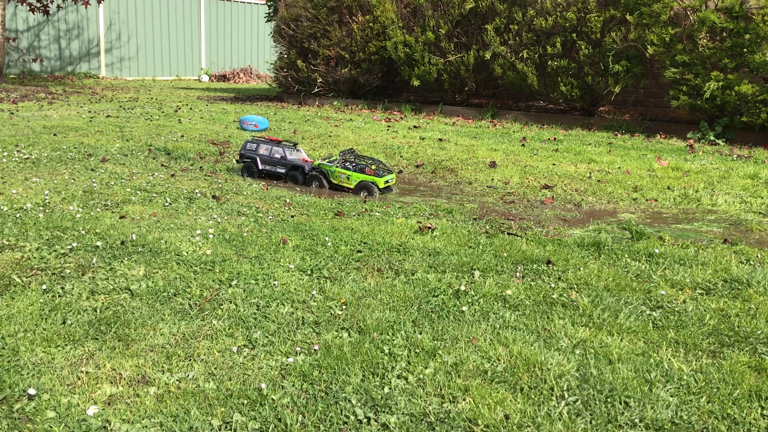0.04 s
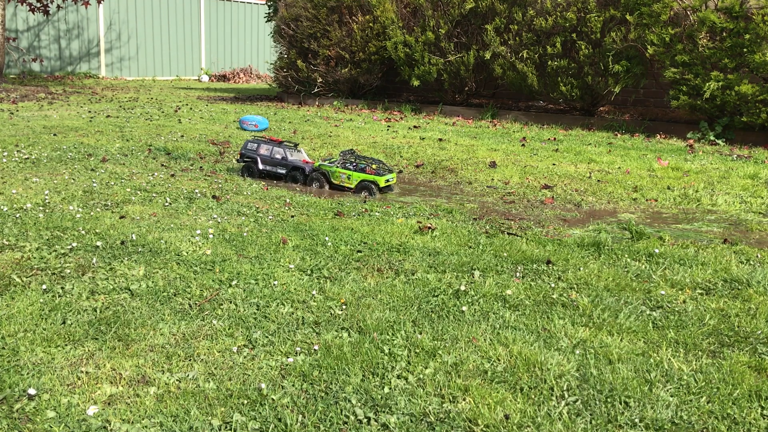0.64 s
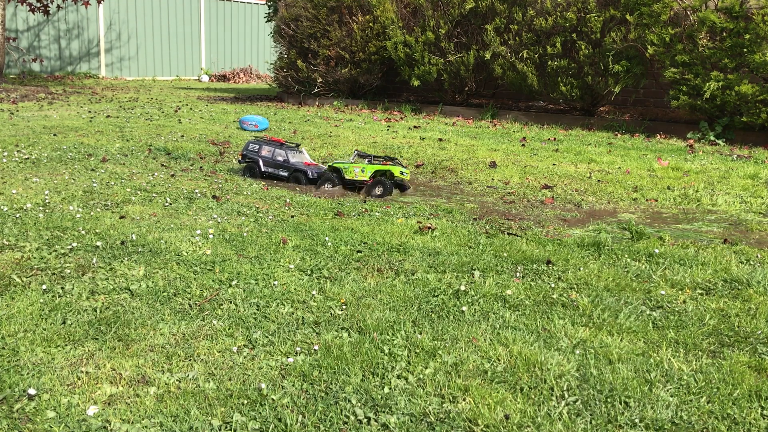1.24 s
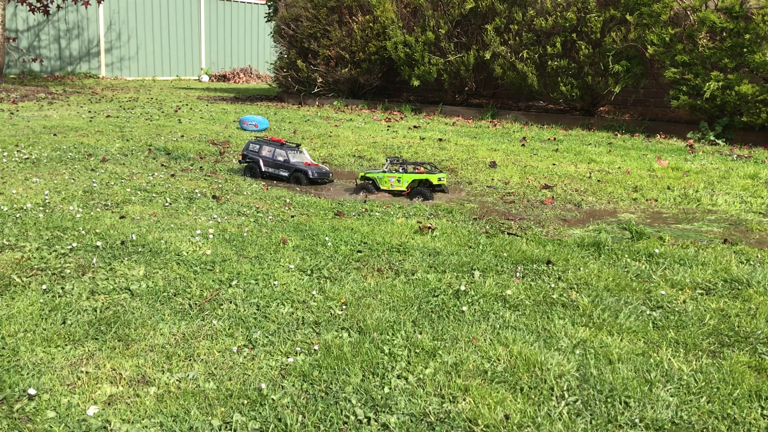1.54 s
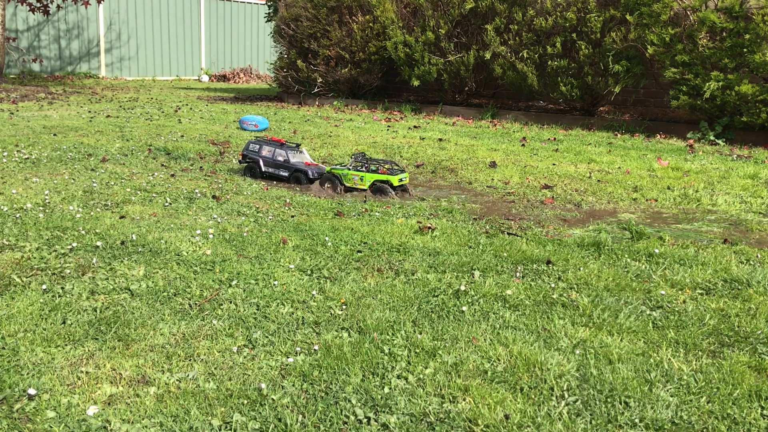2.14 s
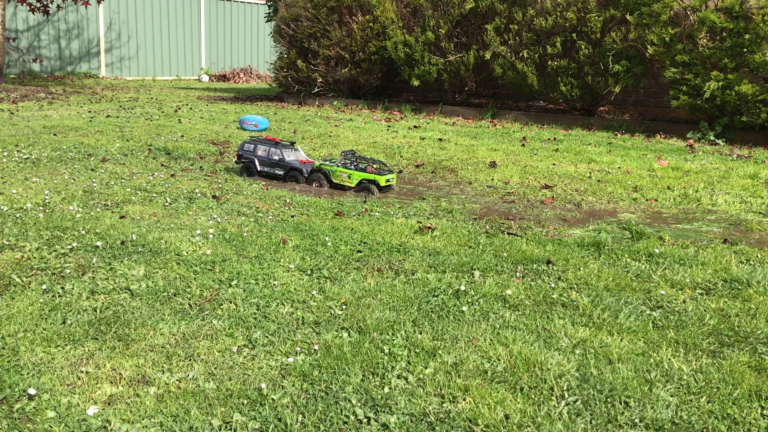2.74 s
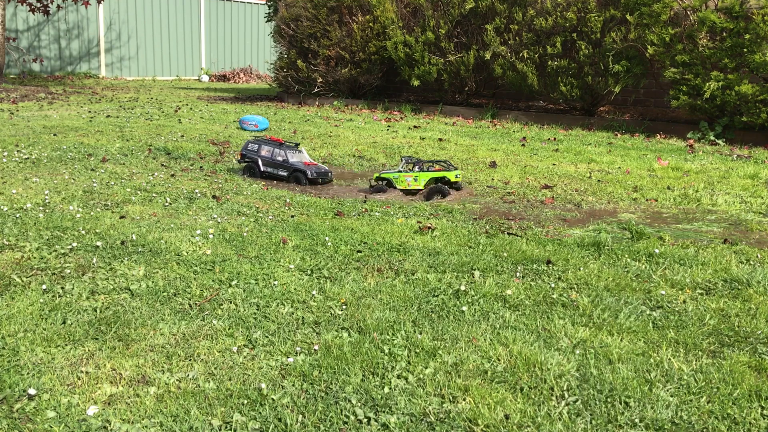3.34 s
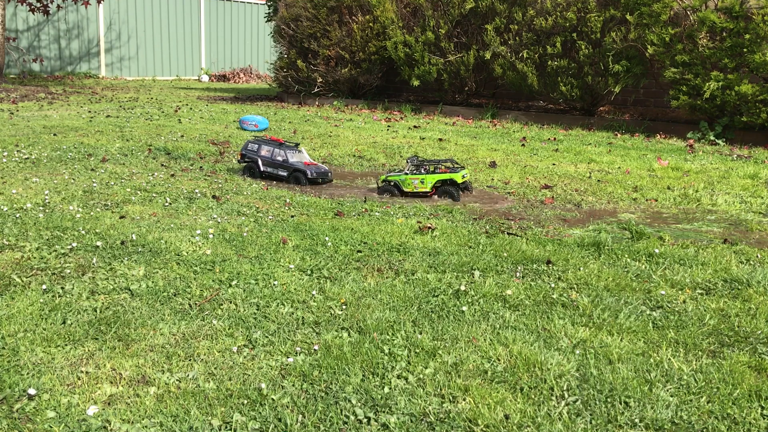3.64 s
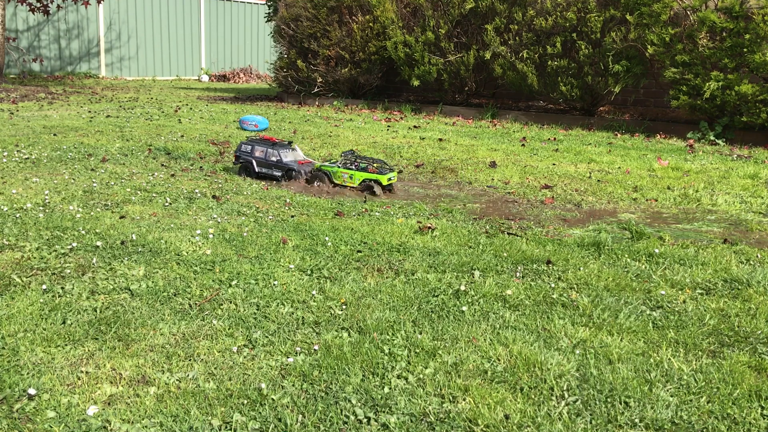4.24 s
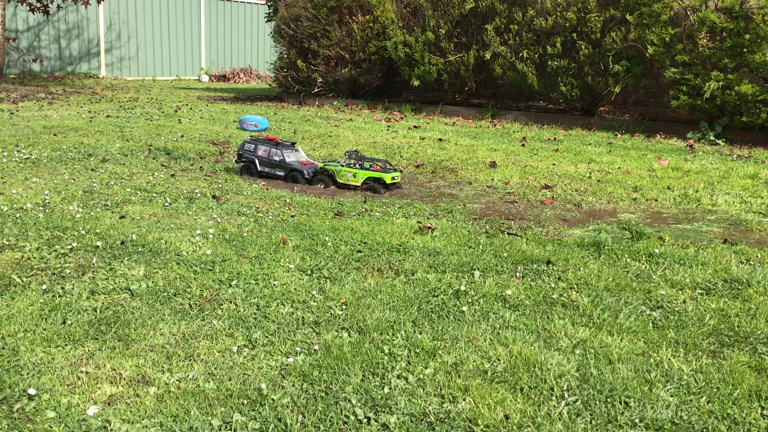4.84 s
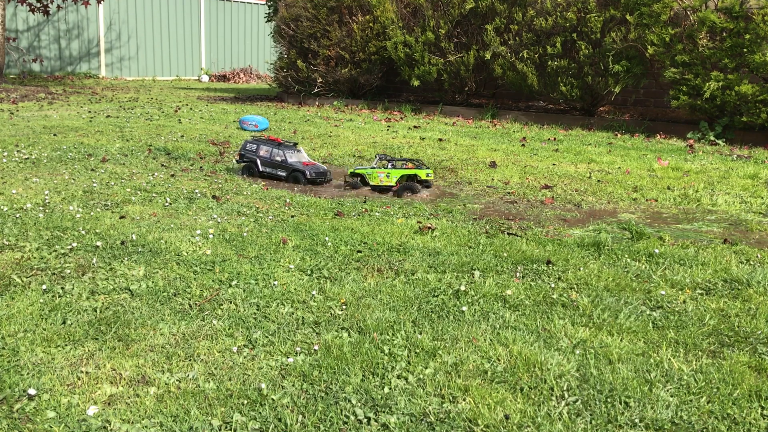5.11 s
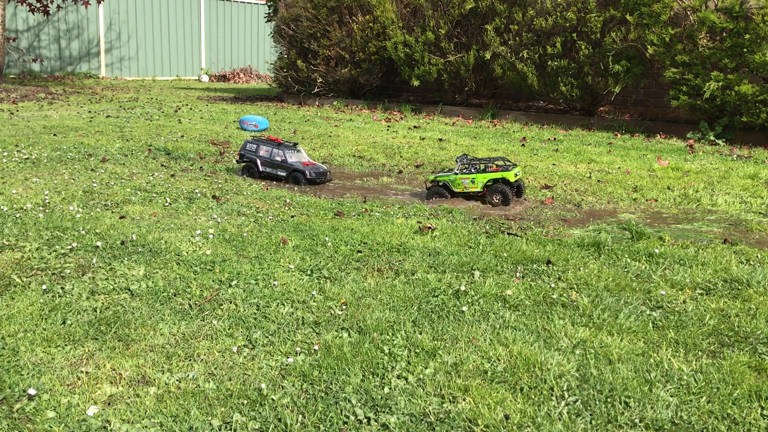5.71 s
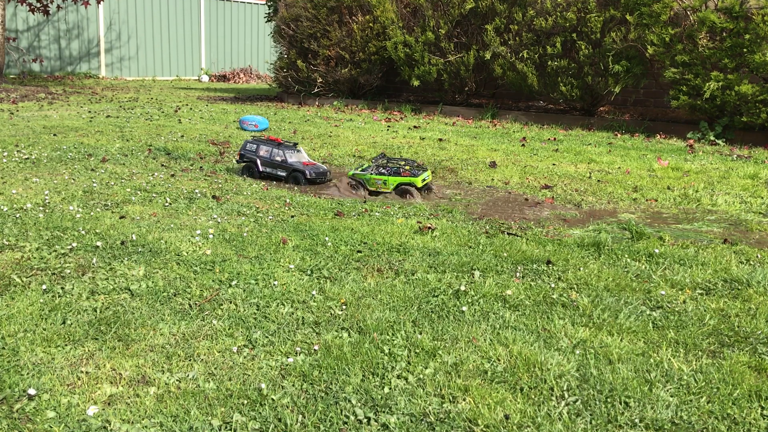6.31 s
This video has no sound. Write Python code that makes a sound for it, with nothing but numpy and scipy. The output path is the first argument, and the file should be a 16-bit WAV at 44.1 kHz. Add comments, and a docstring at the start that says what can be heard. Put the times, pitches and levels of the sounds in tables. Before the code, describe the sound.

Fluttering bursts of small electric motor whine, churning mud and a few plastic knocks from a remote-control truck stuck in a puddle outdoors.

```python
"""Radio-controlled truck in a mud puddle

On a lawn, some metres from a single microphone, the truck rocks back and forth through the mud.
Its gears whine in seven bursts and flutter as the drive shafts turn; the tyres churn and fling wet mud,
and the chassis bumps a second truck. Early on a rasping squeal carries round the yard."""
import sys
import numpy as np
from scipy import signal
from scipy.fft import rfft, irfft
from scipy.io import wavfile
from scipy.ndimage import uniform_filter1d

SR = 44100
rng = np.random.default_rng(int(sys.argv[2]) if len(sys.argv) > 2 else 0)


def master(y):
    """Save y as 16-bit WAV."""
    cut = np.clip(np.atleast_2d(y).T, -1, 1)
    pcm = np.round(cut * 32767)  # scale
    wavfile.write(sys.argv[1], SR, pcm.astype(np.int16))


N = 280917
TIME = np.arange(N) / SR
BAND_LIMIT_HZ = 15850


def amp(db):
    return 10 ** (np.asarray(db) / 20)


def unit(x):
    return x / np.sqrt(np.mean(x ** 2) + 1e-20)


def read(points, hz):
    """A spectrum joined by straight lines on a log-frequency axis."""
    f, value = np.transpose(points)
    return np.interp(np.log(hz + 1), np.log(np.sort(f) + 1), value)


def colour(x, points):
    """Gives x a spectrum and an rms of 1."""
    return unit(irfft(rfft(x) * amp(read(points, np.fft.rfftfreq(N, 1 / SR))), N))


def resonances(x, modes):
    """Passes x through resonances: pitch_hz, width_hz, level_db."""
    f = np.fft.rfftfreq(N, 1 / SR)
    response = sum(amp(db) / np.sqrt(width) / (1 + 2j * (f - hz) / width) for hz, width, db in modes)
    return unit(irfft(rfft(x) * response, N))


def wander(hz):
    """Smooth chance, up to about hz changes a second."""
    f = np.fft.rfftfreq(N, 1 / SR)
    return unit(irfft(rfft(rng.standard_normal(N)) * np.exp(-(f / hz) ** 2), N))


def patchy_noise(depth_db):
    """Noise with random patches of level, some 15 ms by 400 Hz."""
    z = signal.stft(rng.standard_normal(N), nperseg=512, noverlap=384)[2]
    field = uniform_filter1d(uniform_filter1d(rng.standard_normal(z.shape), 5, 0), 5, 1)
    return signal.istft(z * amp(depth_db * unit(field)), nperseg=512, noverlap=384)[1][:N]


def lag(x, seconds):
    """Follows x sluggishly."""
    keep = np.exp(-1 / (seconds * SR))
    return signal.lfilter([1 - keep], [1, -keep], x)


def swells(rows):
    """Sums bell-shaped swells: time_s, half_length_s, height."""
    return sum(height * np.exp(-((TIME - s) / length) ** 2) for s, length, height in rows)


def add(mix, s, sound):
    part = mix[max(round(s * SR), 0):][:len(sound)]
    part += sound[:len(part)]


def grains(per_s, low_hz, high_hz, cycles, spread_db, count=28):
    """Tiny bursting bubbles: short rising pings of many pitches and sizes."""
    t, out = np.arange(900) / SR, np.zeros(N)
    for hz in np.geomspace(low_hz, min(high_hz, BAND_LIMIT_HZ), count):
        pops = rng.random(N) < per_s / count / SR
        sizes = amp(spread_db * np.minimum(rng.exponential(1, N), 3.5))
        ping = np.sin(2 * np.pi * hz * t * (1 + 8 * t)) * np.exp(-t * hz / cycles)
        out += signal.oaconvolve(pops * sizes, ping * np.sqrt(hz))[:N]
    return unit(out)


# open air over the lawn: frequency_hz, density_db
AIR_SPECTRUM = [(15, -45), (25, -27), (40, -11), (60, -2), (85, 0), (130, -4), (220, -13), (450, -23),
                (950, -23), (1500, -25), (2500, -30), (4500, -35), (7800, -38), (11000, -36),
                (15500, -34.5)]


def air(level_db=-54.5):
    """Low outdoor rumble under a faint even hiss, all round the microphone."""
    return amp(level_db + 0.15 * wander(18)) * colour(rng.standard_normal(N), AIR_SPECTRUM)


# how long the yard rings: frequency_hz, t60_s
YARD_DECAY = [(200, .5), (1500, .65), (3000, .75), (4500, .85), (5200, .35), (15000, .2)]


def yard(x):
    """Fence and hedge scatter a thin tail back to the microphone, the high treble dying first."""
    echoes = rng.standard_normal(SR) * (rng.random(SR) < .05) * (np.arange(SR) > 600)
    hz, t, z = signal.stft(echoes, SR, nperseg=256)
    tail = signal.istft(z * amp(-60 * t / read(YARD_DECAY, hz)[:, None]), SR, nperseg=256)[1]
    return signal.fftconvolve(x, tail / np.linalg.norm(tail))[:N]


# a splat of wet mud: frequency_hz, density_db
SPLAT_SPECTRUM = [(500, -22), (2500, 1.5), (6000, 4), (8000, -2.5), (15000, -0.5)]
# the largest spits of mud: time_s, level_db
MUD_SPITS = [(.622, -39), (1.351, -35), (1.543, -37.5), (1.607, -42.5), (3.325, -37), (5.702, -41),
             (5.745, -44.5), (5.873, -43)]
# bubbles in the ruts: start_s, from_hz, to_hz, length_s, level_db
RUT_BUBBLES = [(1.577, 846, 1300, 0.019, -44), (1.615, 1150, 2126, 0.019, -47),
               (1.695, 1040, 1390, 0.012, -46), (1.831, 880, 1214, 0.068, -53.5),
               (1.944, 1173, 1477, 0.096, -50), (5.752, 1737, 1138, 0.029, -46),
               (5.874, 1000, 1520, .028, -44)]


def puddle(speed, small_spits_per_s=6, small_spit_db=-41.5, spit_decay_s=0.004):
    """Draining water ticks faintly, mud spits, some of it thrown at random by the wheels; bubbles glide."""
    out = amp(-75) * grains(per_s=120, low_hz=2500, high_hz=14000, cycles=4, spread_db=3)
    spray, t = colour(rng.standard_normal(N), SPLAT_SPECTRUM), np.arange(900) / SR
    spits = amp(small_spit_db) * speed * (rng.random(N) < small_spits_per_s / SR)
    for s, db in MUD_SPITS:
        add(spits, s, amp([db]))
    out += spray * signal.oaconvolve(spits, np.exp(-t / spit_decay_s))[:N]
    for s, from_hz, to_hz, length, db in RUT_BUBBLES:
        hz = np.linspace(from_hz, to_hz, int(length * SR))
        add(out, s, amp(db) * np.sin(2 * np.pi * np.cumsum(hz) / SR) * np.hanning(len(hz)))
    return out


def shove(start, end, attack_s=0.013, settle_s=0.86, release_s=.05):
    """Pressure on the tyres: builds quickly, settles, lets go."""
    t = np.maximum(TIME - start, 0)
    return np.minimum(t / attack_s, 1) * np.exp(-t / settle_s - np.maximum(TIME - end, 0) / release_s)


# tyres shove against the second truck or out of a rut: start_s, end_s, drumming_db, extra_churn_db
TYRE_SHOVES = [(-.05, 0.694, -47.5, -3), (2.35, 2.74, -49.5, 5), (3.166, 3.333, -54, 2.5),
               (4.276, 4.68, -50.5, 3.5)]
# ring of the hollow tyres: pitch_hz, width_hz, level_db
TYRE_MODES = [(126, 20, 1.5), (190, 71, -4.5), (255, 30, 1.5), (367, 37, 0.5)]


def drumming():
    """Tread blocks beat the hollow tyres during each shove."""
    tread = colour(rng.standard_normal(N), [(20, -40), (110, 0), (400, 0), (1500, -40)])
    level = sum(amp(db) * shove(start, end) for start, end, db, _ in TYRE_SHOVES)
    return level * resonances(tread, TYRE_MODES)


# mud stirred by the tyres: frequency_hz, density_db
CHURN_SPECTRUM = [(20, -50), (60, -36), (150, -5.5), (300, -1.5), (430, -6), (600, 0), (1000, 1), (1400, 4),
                  (1750, -1.5), (2000, -5), (3300, -6), (4000, -18), (9000, -31.5)]
# ring of the chassis: pitch_hz, level_db, t60_s
CHASSIS_MODES = [(165, -22, 0.068), (257, -9, 0.062), (339, -5, 0.057), (370, -15, 0.3), (418.7, -3, 0.29),
                 (583, 2, 0.067), (640, 1, 0.042), (704, -8, 0.054), (843, 3, 0.063), (943, 0, 0.16),
                 (1210, -27, .05), (1360, -5, 0.054)]


def churn(effort, churn_db, db_per_doubling=7.5, settle_s=0.088):
    """Tyres slosh through mud, harder in most shoves, while small knocks rattle the loose chassis."""
    stirred = amp(churn_db + db_per_doubling * np.log2(effort))
    settling = amp(-18.5) * np.sqrt(lag(stirred ** 2, settle_s))
    pressed_db = sum(db * shove(start, end) for start, end, _, db in TYRE_SHOVES)
    level = np.hypot(stirred, settling) * amp(pressed_db)
    slosh = unit(patchy_noise(depth_db=4))
    plops = grains(per_s=600, low_hz=304.2, high_hz=3460, cycles=7.2, spread_db=2.5)
    knocks = rng.standard_normal(N) * (rng.random(N) < 400 / SR)
    rattle = resonances(knocks, [(hz, 22, db) for hz, db, _ in CHASSIS_MODES])
    return level * (colour(slosh + amp(-11.5) * plops, CHURN_SPECTRUM) + amp(-9) * rattle)


# thud of the wheels and clack of the chassis: frequency_hz, density_db
THUD_SPECTRUM = [(20, -50), (50, -24), (90, -11), (170, -2), (350, 0), (550, -10), (1200, -30), (4000, -60)]
CLACK_SPECTRUM = [(30, -55), (100, -28), (400, -5), (650, 0), (1400, 0), (2000, -8), (3200, -13),
                  (6000, -26), (15000, -40)]
# bumps out in the puddle: start_s, thud_db, clack_db, splat_db, decay_s
TRUCK_BUMPS = [(2.336, -47, -37, -35, 0.014), (2.3443, -31, -37, -37.5, 0.0061),
               (2.353, -32, -33, -36.5, 0.013), (2.366, -39, -37, -48, 0.0076),
               (2.392, -31, -45, -38, 0.0052), (2.5048, -40, -28.5, -35, 0.012),
               (3.082, -45, -36.5, -44, 0.0089), (3.091, -51, -35.5, -61, .008),
               (4.274, -38, -33, -44.5, 0.052), (4.3114, -43, -25, -46, 0.0076),
               (4.336, -48, -39, -56, 0.014), (4.444, -58, -34.5, -47, 0.0073)]


def bumps():
    """Each bump is a thud of the wheels, a clack that rings the chassis, and a splat of mud."""
    t, out = np.arange(SR // 4) / SR, np.zeros(N)
    thud, clack, splat = (colour(rng.standard_normal(N), spectrum)
                          for spectrum in (THUD_SPECTRUM, CLACK_SPECTRUM, SPLAT_SPECTRUM))
    for s, thud_db, clack_db, splat_db, decay in TRUCK_BUMPS:
        here = slice(round(s * SR), round(s * SR) + len(t))
        fall = np.exp(-t / decay)
        ring = sum(amp(db - 60 * t / t60) * np.sin(2 * np.pi * (hz * t + rng.random()))
                   for hz, db, t60 in CHASSIS_MODES) / 2
        wheels = amp(thud_db) * thud[here] * np.exp(-t / (1.83 * decay)) * (1 - np.exp(-t / 0.0017))
        chassis = amp(clack_db) * (clack[here] * fall + amp(-5) * ring)
        mud = amp(splat_db) * splat[here] * fall
        add(out, s, wheels + chassis + mud)
    return out


# the squeal's two stretches, a curve each: time_s, pitch_hz, tone_db, rasp_db
SQUEAL_CURVES = [
    [(0.12, 1602, -45, -65), (0.152, 1546, -31.5, -43), (0.188, 1488, -32, -35), (0.214, 1550, -37, -32.5),
     (0.258, 1494, -51, -43), (0.27, 1455, -47, -40), (0.286, 1533, -37.5, -41), (0.3, 1466, -41, -46),
     (0.31, 1513, -48, -58)],
    [(0.34, 1580, -48, -44.5), (0.398, 1598, -36, -35), (0.426, 1558, -32.5, -34.5),
     (0.454, 1499, -48, -37), (0.466, 1532, -44, -36.5), (0.518, 1559, -29.5, -30), (0.536, 1560, -38, -29),
     (0.554, 1472, -28.5, -33), (0.585, 1461, -33, -47)],
]
# its tone: harmonic_number, level_db
SQUEAL_HARMONICS = [(1, 3.5), (2, -5), (3, -12), (4, -42)]
# its rasp: frequency_hz, density_db
RASP_SPECTRUM = [(500, -11), (1150, -22), (1600, 5.5), (2100, -8), (3000, 3), (3550, -1), (3800, -7.5),
                 (4200, -1.5), (6400, -4), (7400, -15), (8500, -9.5), (10300, -12.5), (12000, -9),
                 (15500, -20)]
# ringing inside the rasp: pitch_hz, width_hz, level_db
RASP_MODES = [(1204, 81, 2.5), (2520, 93, 0.5), (2970, 70, 5.5), (3500, 55, 2.5), (3560, 82, 4),
              (4060, 25, -0.5), (4010, 33, -6), (4140, 26, -4), (4320, 50, -8), (5140, 90, -12),
              (6200, 37, -1.5), (6850, 81, -8), (8330, 97, -5.5)]


def squeal(jitter_rad=.2):
    """A shrill tone that breaks up twice into a harsh, ringing rasp and hangs on faintly in the yard."""
    times, *columns = np.vstack(SQUEAL_CURVES).T
    hz, tone_db, rasp_db = (np.interp(TIME, times, column) for column in columns)
    start, end = times[0], times[-1]
    sounding = np.clip(np.minimum(TIME - start, end - TIME) / 0.0076, 0, 1)
    phase = 2 * np.pi * np.cumsum(hz * (1 + .016 * wander(100))) / SR + jitter_rad * wander(400)
    harder = np.clip(TIME / end, .3, 1)  # the overtones grow towards the end
    tone = sum(amp(db) * np.cos(k * phase) * (harder if k > 1 else 1) for k, db in SQUEAL_HARMONICS)
    tone = sounding * amp(tone_db) * unit(tone * (1 + .24 * wander(160)))
    scrape = patchy_noise(depth_db=3.5) * (1 + 0.51 * np.cos(phase)) * amp(wander(280))
    ringing = resonances(rng.standard_normal(N), RASP_MODES)
    rasp = sounding * amp(rasp_db) * unit(colour(scrape, RASP_SPECTRUM) + ringing)
    return tone + rasp + yard(amp(-17.5) * tone + amp(-20) * rasp)


# bursts of throttle: start_s, cut_s, run_up_s, coast_s, top_mesh_hz, whine_db,
# coasting_change_db, overtone_boost_db, churn_db, falling_spray_db
THROTTLE_BURSTS = [(-.3, .555, .15, .19, 1647, -47.5, 1.5, 7.5, -46, -10),
                   (1.208, 1.49, 0.027, .13, 1586, -43, -12, 3.5, -47, -6),
                   (1.781, 2.705, 0.29, 0.077, 1629, -41.5, -7, 4, -47.5, -12),
                   (2.958, 3.405, .022, .15, 1612, -41, -15, 0, -49.5, -7),
                   (3.669, 4.63, .135, .12, 1619, -41.5, -9.5, 2, -47.5, -12),
                   (4.902, 5.645, .032, .13, 1563, -41, -18, 0.5, -48, -5.5),
                   (5.829, 6.345, 0.085, 0.11, 1625, -41.5, -2, 4, -46, -9)]


def throttle(coast_shape=1.3):
    """The motor's effort as a share of the top (run-up, hold, coast) and the burst that is driving."""
    efforts = []
    for start, cut, run_up, coast, *_ in THROTTLE_BURSTS:
        rise = 1 - np.exp(-(np.maximum(TIME - start, 0) / run_up) ** 2)
        fall = np.exp(-(np.maximum(TIME - cut, 0) / coast) ** coast_shape)  # wheels roll on, then slow
        efforts.append(rise * fall)
    return np.maximum(np.max(efforts, 0), 1e-3), np.argmax(efforts, 0)


# flutter of the drive shafts in each burst: sag_time_s, rate_hz, depth_share
SHAFT_FLUTTERS = [(.303, 22.5, .06), (1.345, 20.3, .11), (2.253, 19.7, .07), (3.2, 22, .085),
                  (4.135, 20.9, .08), (5.321, 20.7, .125), (6.262, 22.5, .08)]


def shaft_flutter(mesh_hz, burst):
    """The whine's pitch sags and springs back quickly, over and over, most at full speed."""
    sag_time_s, rate_hz, depth = np.array(SHAFT_FLUTTERS)[burst].T
    angle = 2 * np.pi * rate_hz * (TIME - sag_time_s) + .35 * wander(15)
    flutter = -(.2 + np.cos(angle) + .25 * np.sin(2 * angle)) * np.clip((mesh_hz - 900) / 600, 0, 1)
    grip = 1 + .3 * wander(18)
    return mesh_hz * (1 + depth * grip * flutter + .012 * wander(95)), flutter


# gritty gears and flung water: frequency_hz, density_db
HISS_SPECTRUM = [(700, -21), (1500, 8.5), (2000, 3.5), (2900, -2), (3400, 4), (3800, -1), (5500, 1.5),
                 (7700, -4.5), (9400, 3), (10400, -3), (11500, 0.5), (15500, 1)]


def gear_hiss(mesh_hz, flutter, speed, spray_db, db_per_doubling=18, spray_fall_s=0.067, teeth=11):
    """Gritty teeth rasp once a motor turn; flung water fizzes, squelches and falls back late."""
    flung = amp(-46.5 + db_per_doubling * np.log2(speed))
    level = np.sqrt(flung ** 2 + lag((flung * amp(spray_db)) ** 2, spray_fall_s))
    turn = 2 * np.pi * np.cumsum(mesh_hz) / SR / teeth
    scrape = unit(patchy_noise(depth_db=3.5)) * (1 + 0.085 * np.cos(turn))
    fizz = grains(per_s=700, low_hz=3030, high_hz=14800, cycles=1.2, spread_db=2.5)
    squelch = grains(per_s=260, low_hz=2500, high_hz=13000, cycles=22, spread_db=3.5, count=40)
    return level * amp(2 * flutter) * colour(scrape + amp(-5.5) * fizz + .5 * squelch, HISS_SPECTRUM)


# gear tones through the plastic shell, on their way to the microphone: frequency_hz, gain_db
SHELL_RESPONSE = [(400, -20), (800, 7.5), (1130, 1), (1280, 2), (1600, -1), (1750, 0.5), (1950, -15),
                  (2480, -2), (2750, -16.5), (3150, -7.5), (3480, -6), (3800, -16.5), (6000, -26),
                  (12000, -41.5)]
# the whine's lowest tone flares briefly as the shell rings: time_s, half_length_s, boost_db
SHELL_FLARES = [(1.432, 0.0063, 6), (3.155, 0.0055, 10), (3.202, 0.0086, 13.5), (3.240, 0.0061, 14),
                (3.283, .012, 8), (3.334, 0.0093, 10), (3.868, 0.0062, 11), (4.956, 0.0053, 1.5),
                (5.12, 0.011, 7.5), (5.216, 0.0077, 7), (5.303, 0.01, 13.5), (5.592, .012, 7),
                (5.641, 0.011, 5), (5.965, 0.02, 7.5)]


def gear_whine(mesh_hz, effort, whine_db, bite_db, jitter_rad=0.16, teeth=11):
    """Tooth impacts give a stack of tones that catch and slacken; an off-centre pinion adds sidebands."""
    level = amp(whine_db + 11 * np.log2(effort))
    bite = amp(bite_db + 9 * np.log2(effort))  # overtones grow faster under load
    phase = 2 * np.pi * np.cumsum(mesh_hz) / SR
    slack_phase = phase + jitter_rad * wander(340)
    tones = np.zeros(N)
    for k in range(1, 9):
        contact = unit(amp(3.4 * np.tanh(wander(55))) * (1 + 0.38 * wander(200)))
        boost = bite if k > 1 else amp(swells(SHELL_FLARES))
        tones += amp(read(SHELL_RESPONSE, k * mesh_hz)) * np.cos(k * slack_phase) * contact * boost
    pinion = 1 + 0.1 * np.cos(phase / teeth) + 0.1 * np.cos(2 * phase / teeth + wander(22))
    idler = amp(-22.5) * np.cos(slack_phase / 2) * wander(74)  # a slower gear, an octave below
    return level * (tones * pinion + idler)


# the wheels bog down and the motor labours: time_s, half_length_s, speed_lost_share
MUD_DRAGS = [(.06, .14, .22), (1.27, .09, 0.15), (2.46, .06, .22), (3.0, .07, .19), (3.1, .03, .2),
             (3.94, .07, .07), (4.43, .05, 0.15), (4.98, .1, 0.14)]


def truck(take_up_s=0.0093, unload_s=0.037):
    """The truck, some metres off: the throttle sets the motor's effort and mud drags its speed down."""
    effort, burst = throttle()
    settings = np.array(THROTTLE_BURSTS)[burst].T
    _, cut, _, _, top_hz, whine_db, coasting_db, bite_db, churn_db, spray_db = settings
    speed = effort * (1 - swells(MUD_DRAGS))
    mesh_hz, flutter = shaft_flutter(top_hz * speed, burst)
    load = lag(effort, take_up_s)  # the teeth take up their load a moment late
    unloaded = np.clip((TIME - cut) / unload_s, 0, 1)  # and shed it once the power is cut
    whine = gear_whine(mesh_hz, load, whine_db + coasting_db * unloaded, bite_db)
    hiss = gear_hiss(mesh_hz, flutter, speed, spray_db)
    return whine + hiss + churn(effort, churn_db) + drumming() + bumps() + puddle(speed)


def scene():
    """At the microphone: the truck, its faint echo off the yard, the squeal and the open air."""
    direct = truck()
    return (direct + amp(-16.5) * yard(direct) + squeal() + air())[None]


def record(dry):
    """The recorder's band limit."""
    lowpass = signal.firwin(511, BAND_LIMIT_HZ, window=("kaiser", 9), fs=SR)
    return signal.oaconvolve(dry, lowpass[None], "same")


dry = scene()
out = record(dry)
master(out)
```